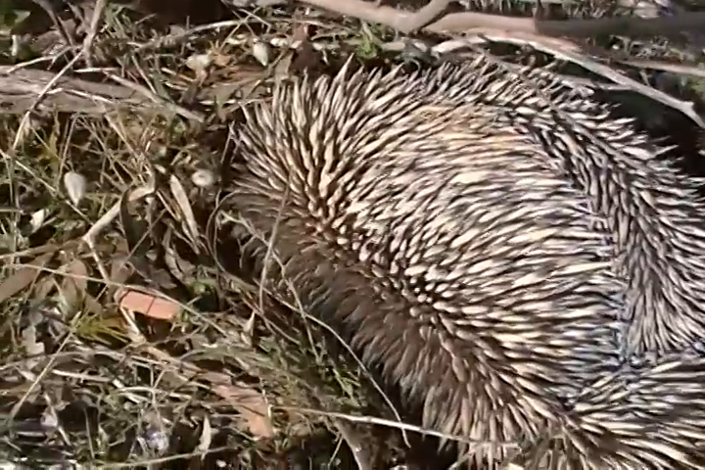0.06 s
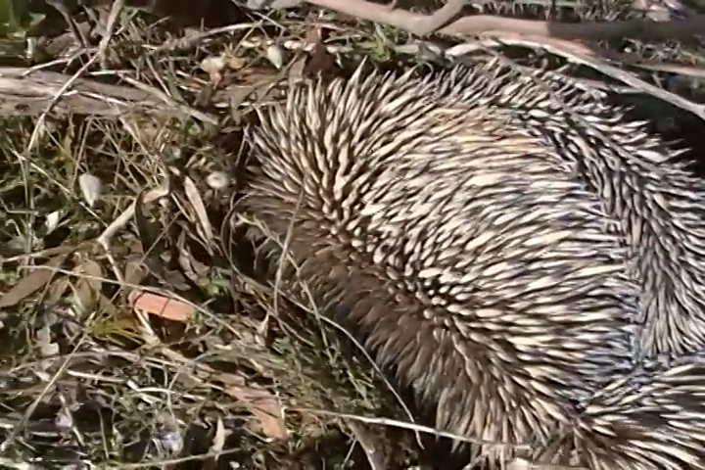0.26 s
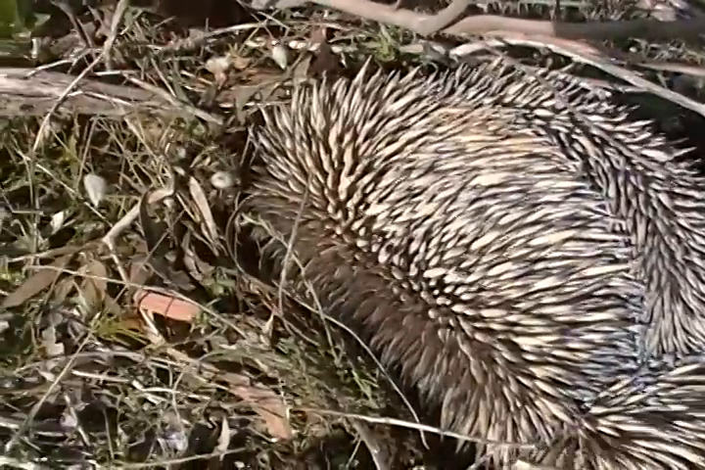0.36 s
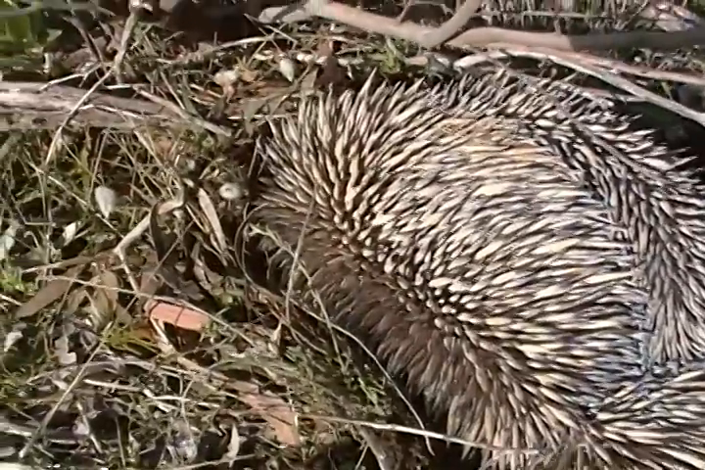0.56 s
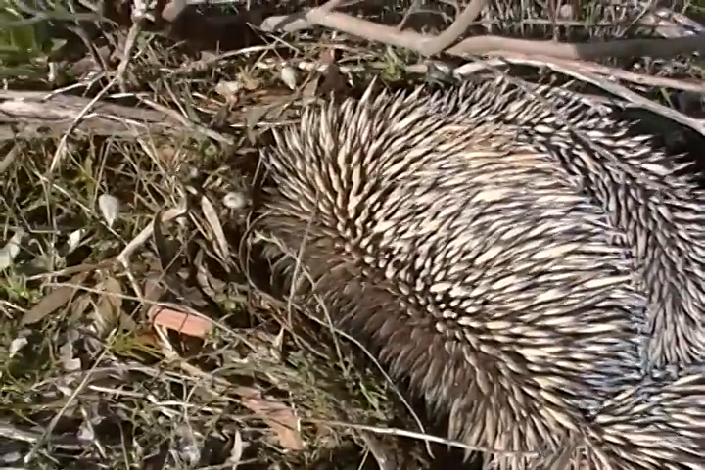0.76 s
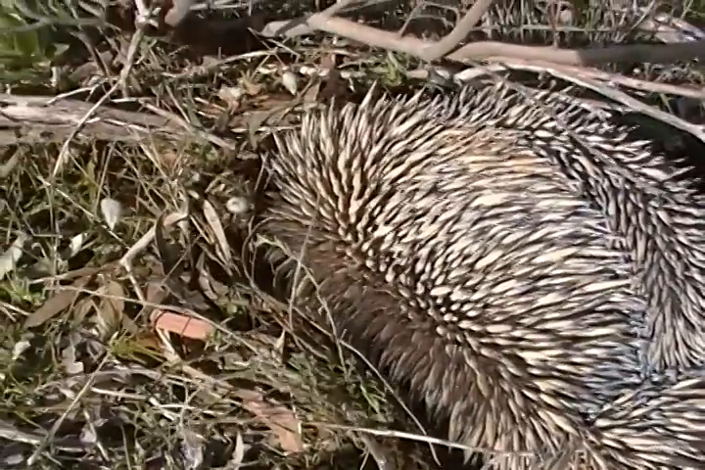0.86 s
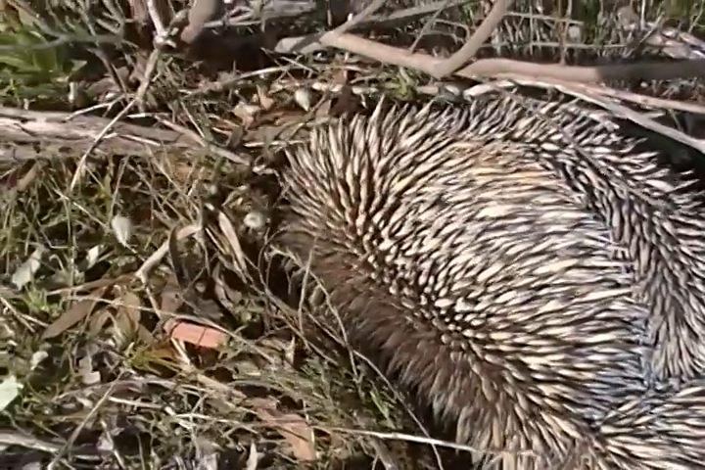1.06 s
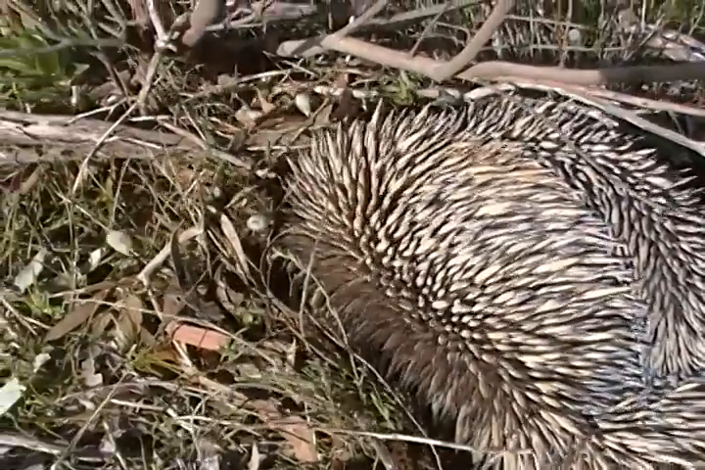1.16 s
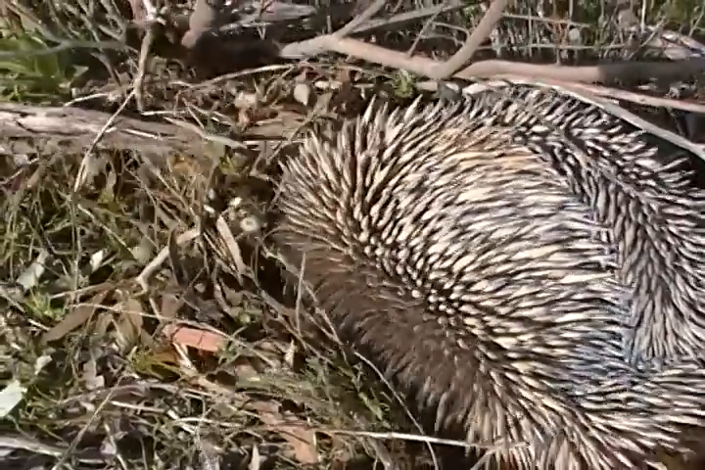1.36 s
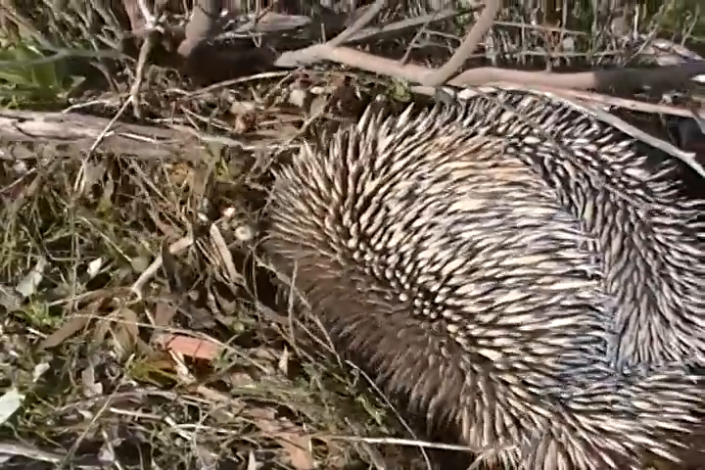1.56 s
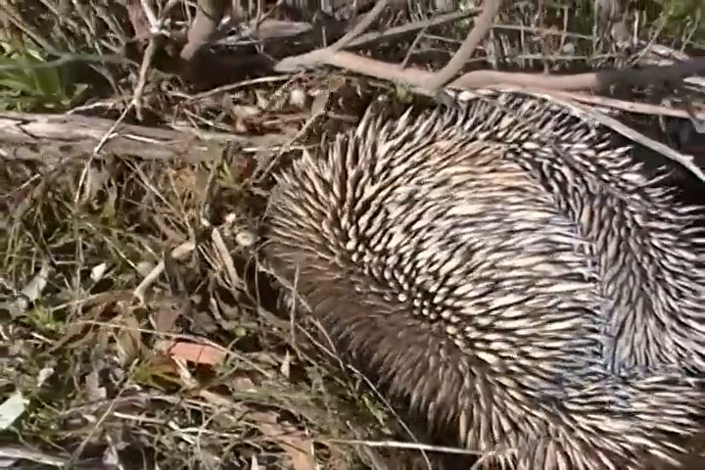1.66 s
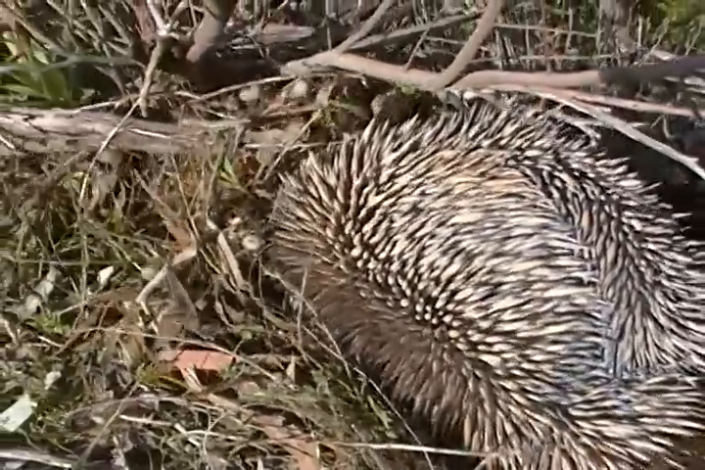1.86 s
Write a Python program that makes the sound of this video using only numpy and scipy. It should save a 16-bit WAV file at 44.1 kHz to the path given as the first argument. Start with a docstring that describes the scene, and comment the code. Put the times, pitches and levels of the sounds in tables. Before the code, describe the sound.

An echidna rustles through dry leaf litter close by, faintly at first, over an outdoor hush. A small handling knock comes at the start. Wind thumps the microphone hardest around 0.5 seconds and more lightly near 1.1. Small twigs snap throughout, sharpest at about 0.7, 1.1 and 1.4 seconds. The crackly rustle swells to a peak near 1.4 seconds, then eases and continues softly until 1.9.

```python
"""A small knock on the hand-held recorder and a low rumble of wind come first, over an outdoor hush.
Light gusts buffet the two microphone ports in turn with turbulent pressure.
Close by, an echidna shoves through dry leaf litter and grass: twigs fracture under it and ring,
and the friction of its spines on the leaves builds into one swelling rustle."""
import sys
import numpy as np
from scipy import signal
from scipy.fft import rfft, irfft
from scipy.io import wavfile
from scipy.ndimage import uniform_filter1d, minimum_filter1d

SR = 44100
rng = np.random.default_rng(int(sys.argv[2]) if len(sys.argv) > 2 else 0)


def materialize(psi):
    """Save the field psi as 16-bit PCM at rate SR to the path in sys.argv[1].

    A 1-D psi becomes a single channel; in a 2-D psi each row is a channel.
    """
    bounded = np.clip(np.atleast_2d(psi).T, -1, 1)
    quanta = np.round(bounded * 32767).astype(np.int16)
    wavfile.write(sys.argv[1], SR, quanta)


N = 83790
T = np.arange(N) / SR
PAN = np.array([[.5], [-.5]])   # shares a left-minus-right difference between the channels


def from_db(db):
    """Amplitude ratio of a level: tenfold for every 20 dB."""
    return 10 ** (np.asarray(db) / 20)


def in_time(rows):
    """Linear interpolation of (t/s, value) rows at every sample."""
    return np.interp(T, *np.transpose(rows))


def at_hz(rows, hz):
    """Interpolation of (f/Hz, value) rows on a logarithmic frequency axis."""
    frequencies, values = np.transpose(rows)
    return np.interp(np.log(hz), np.log(frequencies), values)


def bands(sources):
    """Third-octave analysis into (centre, signal); neighbours alternate between two sources."""
    edges = 18 * 2 ** (np.arange(30) / 3)
    for k, (low, high) in enumerate(zip(edges, edges[1:])):
        bandpass = signal.butter(2, [low, high], "band", fs=SR, output="sos")
        yield np.sqrt(low * high), signal.sosfilt(bandpass, sources[k % 2])


def coloured(texture, spectrum, correlation):
    """Partially coherent stereo noise of unit rms, each band amplitude-modulated by texture(hz)."""
    out = 0
    for hz, (mid, side) in bands(rng.standard_normal((2, 2, N))):
        alike = np.clip(at_hz(correlation, hz), -1, 1)
        stereo = np.sqrt(1 + alike) * mid + np.sqrt(1 - alike) * side * [[1], [-1]]
        out = out + from_db(at_hz(spectrum, hz)) * texture(hz) * stereo
    return out / np.sqrt(np.mean(out ** 2) + 1e-20)


def decay(t, t60):
    """Exponential damping: the level falls 60 dB in t60 seconds."""
    return np.exp(-np.log(1000) * t / max(t60, 1e-4))


def add(out, start_s, sound):
    """Superposition: a short sound adds to the mix from start_s on."""
    i = int(np.clip(start_s * SR, 0, N - 1))
    out[:, i:i + sound.shape[-1]] += sound[..., :N - i]


def air():
    """Ambient noise: a steady distant hush, most coherent between the ports at long wavelengths."""
    # outdoor noise spectrum: f/Hz, relative density level/dB
    spectrum = [(30, 2), (120, 5.5), (250, -5), (450, -12.5), (900, -20.5), (2000, -24.5), (4500, -28),
                (7000, -29), (9800, -29.5), (12000, -48.5)]
    # likeness of the channels: f/Hz, correlation
    correlation = [(60, 1), (300, 0.84), (1500, 0.26), (4500, 0.05), (7000, 0.15), (10000, .1),
                   (12000, -0.1)]
    return from_db(-39.5) * coloured(lambda hz: 1, spectrum, correlation)


def wind():
    """Turbulent pressure fluctuates independently at each port and grows brighter in the gusts."""
    # wind pressure on each port: t/s, level/dB
    left_gusts = [(0, -27.5), (.2, -34.5), (.27, -25.5), (.38, -39), (.46, -31), (.5, -24), (.6, -16),
                  (.65, -27), (.75, -45), (.87, -34), (1.02, -29.5), (1.07, -33), (1.11, -21),
                  (1.16, -25.5), (1.25, -27), (1.38, -37), (1.46, -35.5), (1.9, -37.5)]
    right_gusts = [(0, -27), (.1, -28), (.16, -22), (.27, -29), (.35, -27), (.42, -22.5), (.465, -4.5),
                   (.52, -7), (.585, -12.5), (.625, -33), (.75, -33.5), (1.06, -32.5), (1.15, -16),
                   (1.22, -25.5), (1.3, -26), (1.36, -24), (1.44, -35.5), (1.9, -35.5)]
    # turbulence spectrum: f/Hz, relative density level/dB
    spectrum = [(20, 1.5), (35, 1.5), (62, -2), (110, -11), (160, -23), (250, -35.5), (400, -37)]
    gust_db = np.array([in_time(left_gusts), in_time(right_gusts)])
    tilt_db_per_octave = 0.026 * (gust_db - gust_db.mean())
    turbulence = 0
    for hz, noise in bands(rng.standard_normal((2, 2, 2 * N))):
        octaves = np.clip(np.log2(hz / 60), -1, 2)
        band_db = at_hz(spectrum, hz) + tilt_db_per_octave * octaves
        turbulence = turbulence + noise[:, N:] * from_db(band_db)   # the filters have settled by N
    power = uniform_filter1d(uniform_filter1d(turbulence ** 2, size=1500), size=1000)
    steady = turbulence / np.sqrt(power + 1e-20)
    lowpass = signal.butter(4, 258.4, fs=SR, output="sos")
    return signal.sosfilt(lowpass, steady * from_db(gust_db))


def buffets():
    """A passing eddy thuds on the ports: a pressure pulse with shallow suction before and after."""
    # eddies: t/s, peak level/dB, spectral peak f/Hz, pan L-R/dB
    eddies = [(0.26, -19.5, 65, -9), (0.432, -11, 24, -12.5), (0.462, -12.5, 107, -19),
              (0.47, -24, 184, -14.5), (0.478, -29, 330, -23.5), (0.506, -10, 38, 10),
              (0.515, -12.5, 107, -7), (1.102, -12.5, 36, 11), (1.17, -24, 73, -27), (1.38, -23, 43.6, -7),
              (1.3805, -26, 380, 0)]
    out = 0
    for peak_s, db, hz, pan_db in eddies:
        u = (np.pi * hz * (T - peak_s)) ** 2
        ricker_pulse = (1 - 2 * u) * np.exp(-np.minimum(u, 50))
        out = out + ricker_pulse * from_db(db + pan_db * PAN)
    return out


def knock():
    """Impact excitation: a finger ticks on the case, whose modes shake the two ports out of phase."""
    # modes of the case: f/Hz, relative level/dB, t60/s, phase R-L/rad
    case_modes = [(300, -13, 0.089, 0.61), (790, -1, 0.036, 2.42), (1070, 1.5, 0.0065, 0.92),
                  (2050, -4, 0.012, 0.29), (2690, -3.5, 0.0096, 0.37), (3450, 2, .006, 1.4),
                  (6100, -4, 0.005, 2.0), (10320, -7.5, 0.0091, .8)]
    start_s, knock_db = 0.013, -23
    out, t = np.zeros((2, N)), T[:SR // 10]
    for hz, db, t60, phase in case_modes:
        mode = decay(t, t60) * np.sin(2 * np.pi * hz * t - phase * PAN)
        add(out, start_s, from_db(knock_db + db) * mode)
    lowpass = signal.butter(1, 5000, fs=SR, output="sos")
    tick = signal.sosfilt(lowpass, rng.standard_normal((2, len(t)))) * decay(t, t60=0.011)
    add(out, start_s, from_db(knock_db - 3) * tick)
    return out


def snaps():
    """Brittle fracture rings a twig's modes and sheds splinters; the sound scatters off the litter."""
    # breaks: t/s, level before filtering/dB, centre f/Hz, width/octaves, splinter t30/s, pan L-R/dB
    breaks = [(0.091, -35.5, 4000, 3.6, 0.011, -1), (0.207, -28, 9100, 2.6, 0.0036, -5),
              (0.25, -35, 7000, 1.5, .003, 4), (0.4628, -21.5, 796, 2.3, 0.0034, -13),
              (.474, -20.5, 600, 0.98, 0.0064, -13), (.475, -31, 5000, 0.5, 0.0045, -12),
              (0.547, -19, 9400, 0.59, 0.011, -3.5), (0.573, -32.5, 9000, 1.4, 0.0076, -7),
              (0.729, -18, 1260, 0.22, 0.017, -1.5), (0.7296, -28.5, 7400, 1.1, 0.016, 0),
              (0.7402, -8.5, 6300, 1.25, 0.00088, -1.5), (0.761, -36, 6600, 0.68, 0.0078, 4),
              (0.775, -32, 6000, 1.2, 0.0078, 0), (0.905, -31, 4460, 0.45, 0.0059, -7.5),
              (.943, -22, 795, 1.1, 0.012, .5), (.944, -32, 8500, 0.83, 0.014, 6),
              (.957, -29, 9500, .8, .005, 0), (1.032, -29, 5550, 3.6, 0.0045, -0.5),
              (1.0678, -17, 10200, 0.37, 0.015, -2), (1.0748, -11.5, 5000, 0.4, 0.0043, 1.5),
              (1.0759, -11.5, 1430, 0.54, .004, -1), (1.08, -19.5, 4770, 0.42, 0.015, -6),
              (1.375, -10.5, 2780, 0.7, 0.0036, 0), (1.3802, -17, 600, 2.8, 0.0029, 0),
              (1.385, -16.5, 3860, 2, 0.0031, 0), (1.415, -31, 9000, 0.88, 0.0034, -11),
              (1.4202, -16, 9500, 0.59, .003, 10), (1.486, -31, 2230, 0.76, .01, -1),
              (1.4955, -20, 5650, 0.75, .003, -7), (1.589, -27, 4670, .6, 0.014, -4)]
    # modes of dry wood: f/Hz, relative level/dB, t60/s
    twig_modes = [(1263, -19, 0.018), (2180, -16.5, 0.011), (3040, -12.5, 0.0069), (4350, -13, 0.0098),
                  (4810, -10.5, 0.0076), (6600, -9, 0.0039), (8110, -10, 0.01), (9930, 0.5, 0.002)]
    # a resonance of the left port shifts the phase of the twig sounds: f/Hz, phase lag/rad
    port_lag = [(100, .1), (1200, 0.32), (3000, 0.51), (5600, 0.95), (6400, 1.7), (7600, 3.0), (9000, 1.46),
                (11000, 3)]
    out, t = np.zeros((2, N)), T[:SR // 10]
    ring = sum((-1) ** k * from_db(db) * np.sin(2 * np.pi * hz * t) * decay(t, t60)
               for k, (hz, db, t60) in enumerate(twig_modes))
    for start_s, db, hz, octaves, t30, pan_db in breaks:
        noise = rng.standard_normal((3, len(t)))
        splinters = from_db(-5.5) * noise[0] * decay(t, t60=2 * t30)
        scatter = from_db(-19) * noise[1:] * decay(t, t60=.024)
        edges = [hz / 2 ** (octaves / 2), min(hz * 2 ** (octaves / 2), SR / 2 - 1000)]
        bandpass = signal.butter(1, edges, "band", fs=SR, output="sos")
        crack = signal.sosfilt(bandpass, ring + splinters + scatter)
        add(out, start_s, crack * from_db(db + pan_db * PAN))
    lag = at_hz(port_lag, np.fft.rfftfreq(N, 1 / SR) + 1)
    left = irfft(rfft(out[0]) * np.exp(-1j * lag), N)
    return np.array([left, out[1]])


def rustle():
    """Friction: spines slide on leaves and flick their edges; pushing harder crackles more and louder."""
    # the body's push through the litter, heard as rustle: t/s, level/dB
    push = [(0, -49.5), (.05, -62), (.085, -53), (.12, -59), (.4, -59), (.58, -56.5), (.68, -59.5),
            (.76, -51.5), (.82, -58), (.92, -53.5), (.95, -53.5), (1.04, -52), (1.13, -46), (1.22, -50),
            (1.31, -49), (1.35, -38), (1.382, -30), (1.417, -31), (1.435, -39), (1.49, -37.5),
            (1.54, -45.5), (1.64, -49), (1.76, -44), (1.9, -40.5)]
    # spectrum of dry leaves rubbing: f/Hz, relative density level/dB
    spectrum = [(150, 5), (400, -10.5), (900, -2.5), (2200, 1), (3200, 1), (4700, 3.5), (7000, -3),
                (9500, 4.5), (11500, -2.5), (13000, -27)]
    # likeness of the channels: f/Hz, correlation
    correlation = [(300, 0.87), (2500, 0.88), (4800, 0.82), (6700, -0.46), (8200, .1), (10000, 0.55)]
    slide_db, crackle_db, spread_db = -6.5, -5, 2.5
    crackle_t60_s, crackle_octaves = .006, .8
    push_db = in_time(push)
    flicks_per_s = 820 * from_db((push_db - push_db.mean()) / 2)
    flicks = rng.random(N) < flicks_per_s / SR
    sizes = flicks * from_db(spread_db * np.minimum(rng.exponential(1, N), 4))
    log_pitch = rng.uniform(np.log2(500), np.log2(14000), N)
    power_kept = decay(1 / SR, crackle_t60_s) ** 2   # from one sample to the next

    def texture(hz):
        """Incoherent sources add in power: smooth sliding plus the crackles pitched near this band."""
        reach = np.exp(-((log_pitch - np.log2(hz)) / crackle_octaves) ** 2)
        power = signal.lfilter([1], [1, -power_kept], sizes ** 2 * reach + 1e-18)
        local_mean = np.abs(uniform_filter1d(power, size=9000)) + 1e-6
        crackles = np.sqrt(power / local_mean)
        return np.hypot(from_db(slide_db), from_db(crackle_db) * crackles)
    return from_db(push_db) * coloured(texture, spectrum, correlation)


def scene():
    """Linear superposition of the air, the wind and knock at the microphone, and the animal."""
    return air() + wind() + buffets() + knock() + snaps() + rustle()


def record(dry):
    """Peak limiting ducks each channel under the strongest gust; a steep low-pass cuts the top."""
    threshold, stopband_hz = .8, 13485
    gain = minimum_filter1d(threshold / np.maximum(np.abs(dry), threshold), size=900)
    smooth_gain = uniform_filter1d(uniform_filter1d(gain, size=450), size=450)
    lowpass = signal.cheby2(12, 62, stopband_hz, fs=SR, output="sos")
    return signal.sosfilt(lowpass, dry * smooth_gain)


dry = scene()
out = record(dry)
materialize(out)
```